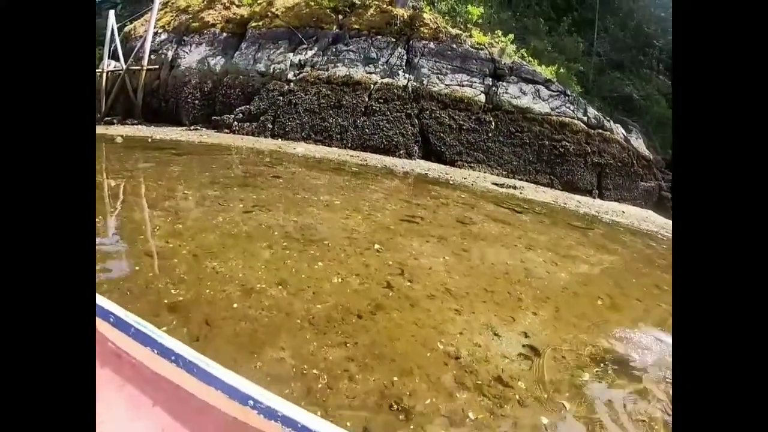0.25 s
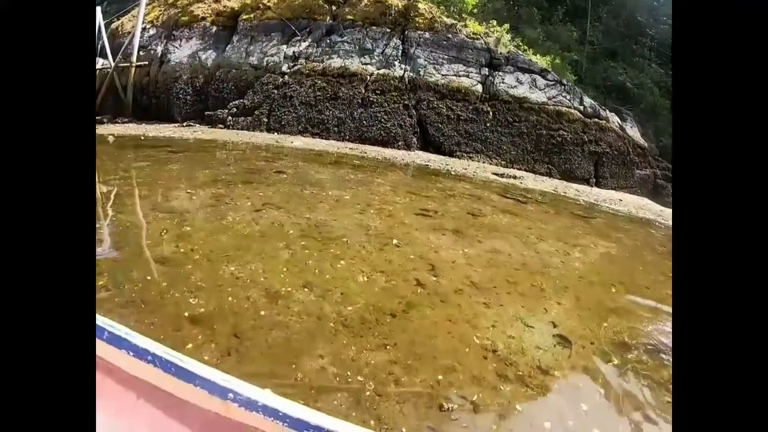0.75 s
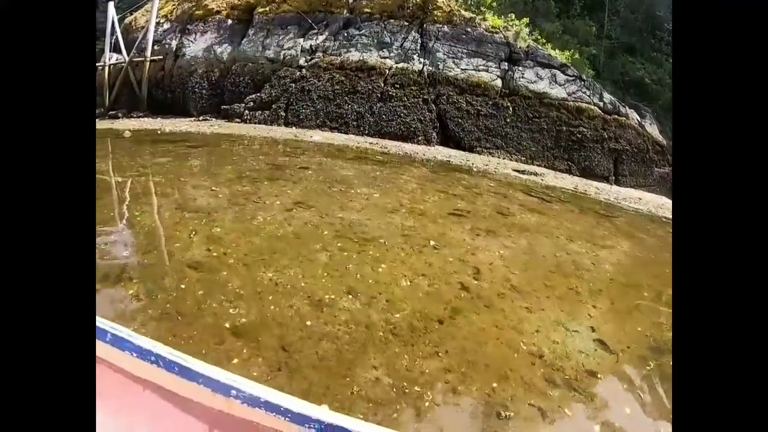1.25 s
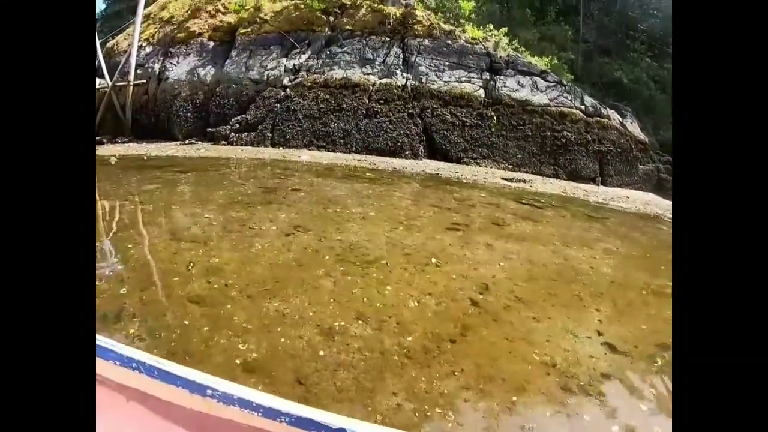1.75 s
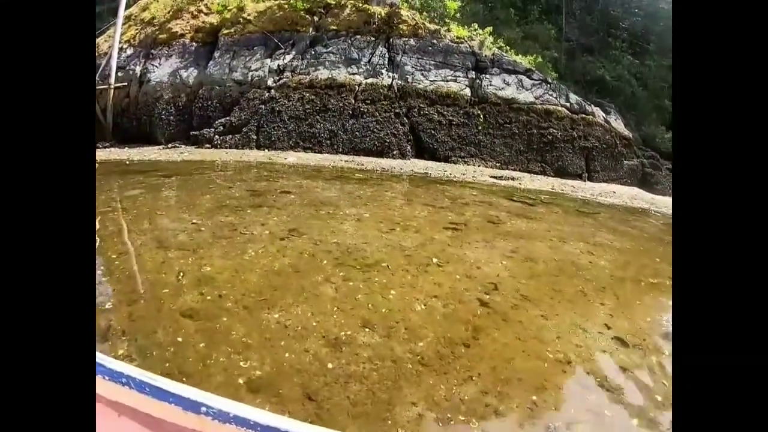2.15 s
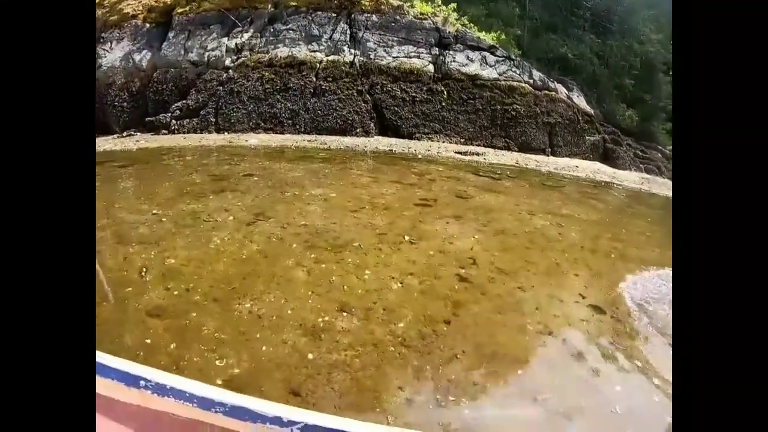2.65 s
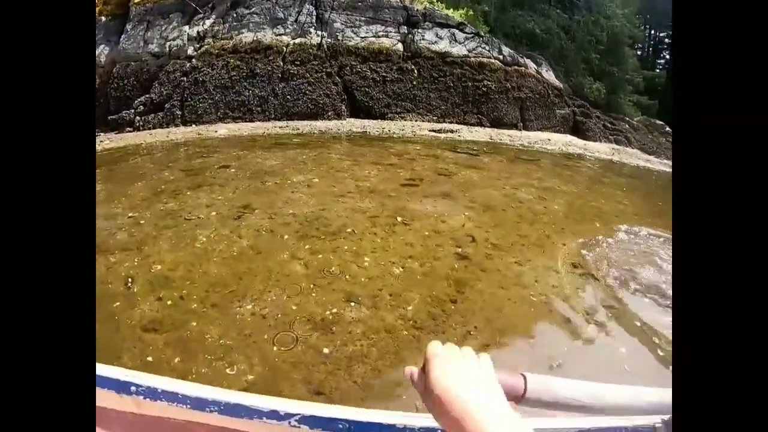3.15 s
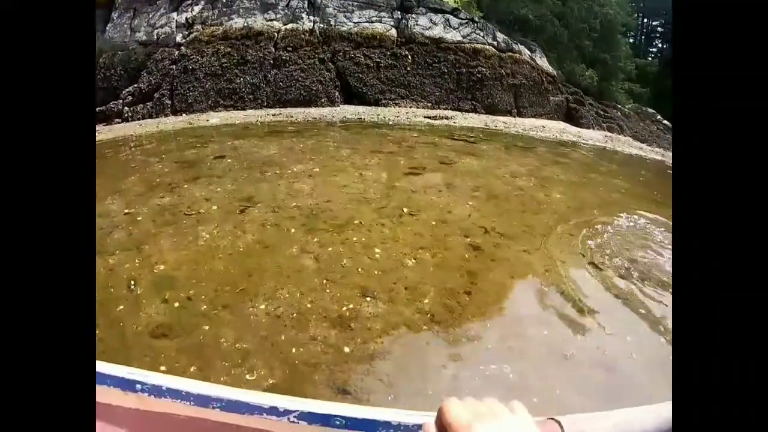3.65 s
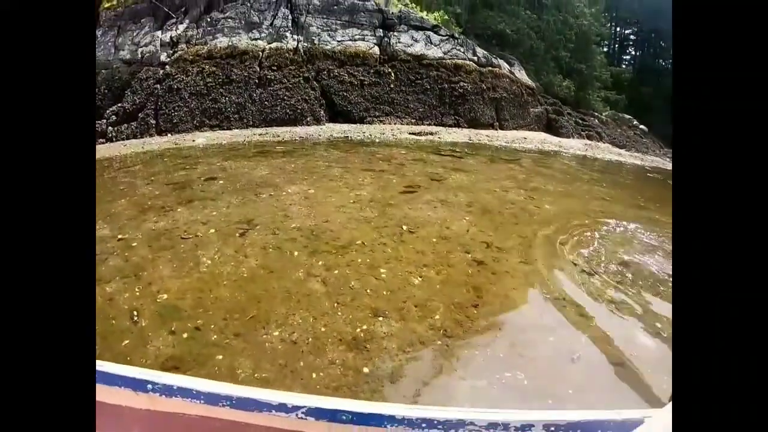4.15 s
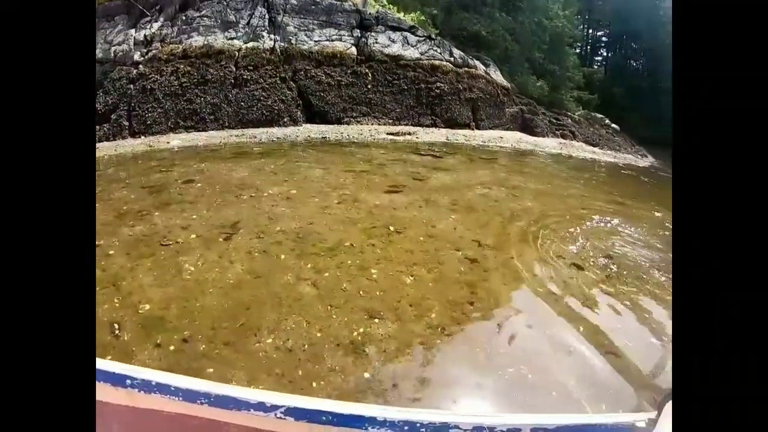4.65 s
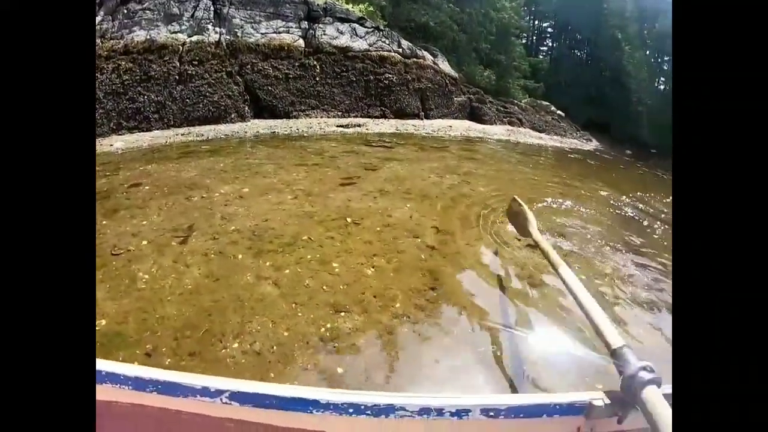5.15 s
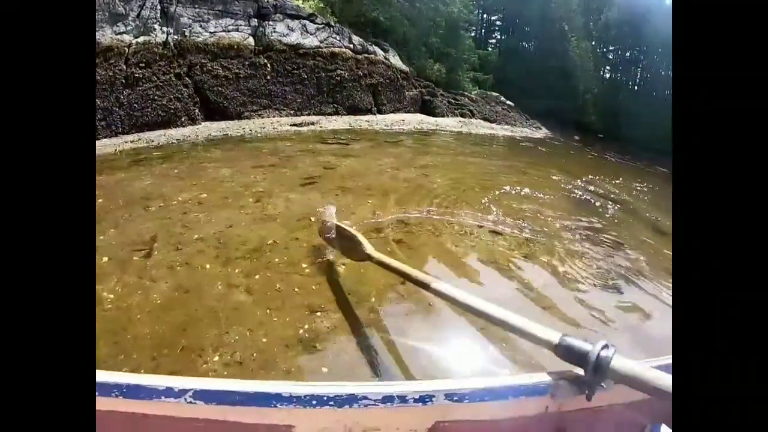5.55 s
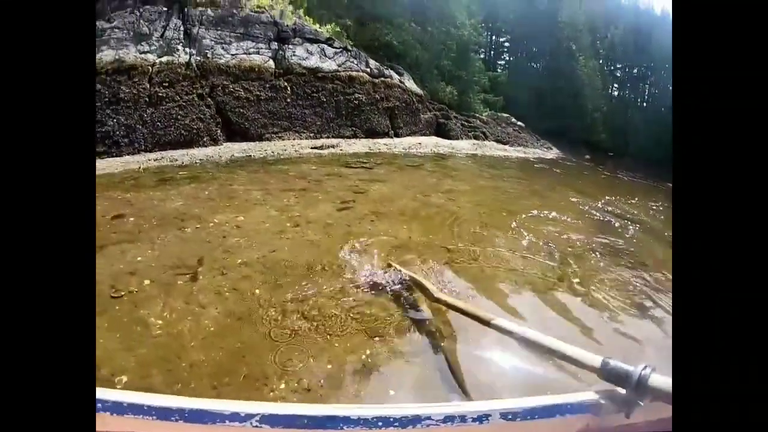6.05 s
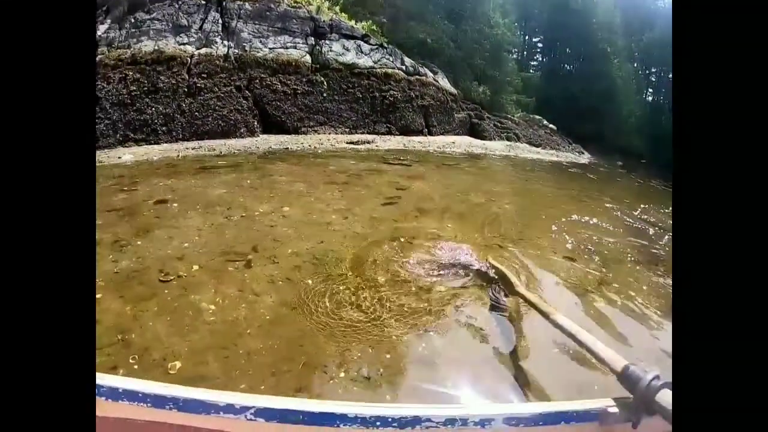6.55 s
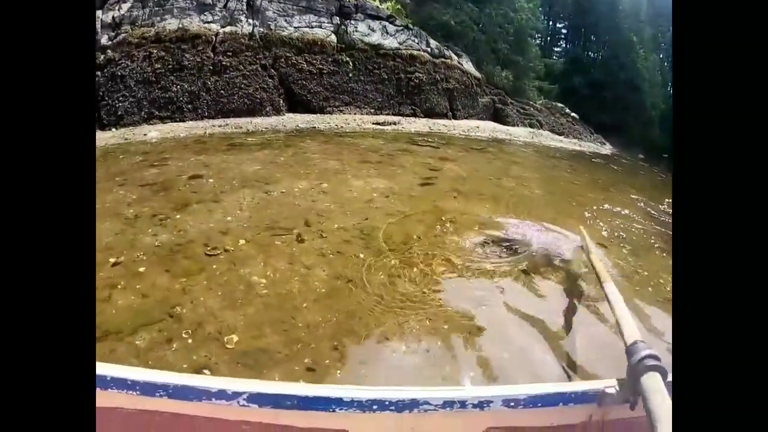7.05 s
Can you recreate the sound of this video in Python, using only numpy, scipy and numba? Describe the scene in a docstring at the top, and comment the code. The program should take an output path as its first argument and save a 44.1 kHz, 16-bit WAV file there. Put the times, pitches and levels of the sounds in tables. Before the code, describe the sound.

Hollow wooden knocks and a faint oar creak from a small rowing dinghy, with bubbly plops, gurgles and splashes in shallow, sheltered water.

```python
"""Oars knock and creak in the rowlocks of a small dinghy on shallow water, heard from a camera worn by the rower.
Knocks, a few low wind pops, slips and rubs excite damped modes; a murmur keeps the low hull modes sounding.
Blades stir crowds of pitch-climbing bubbles and noise washes; plops, gulps, droplet ticks and spray join them.
Low noise buffets, wind gusts and some hull thuds, rumble at the two microphone ports over a smooth far wash.
For a while the stereo narrows to one dull microphone, then slowly widens."""
import sys
import numpy as np
from scipy import signal
from scipy.io import wavfile
from scipy.ndimage import uniform_filter1d
from numba import njit

SR = 44100
rng = np.random.default_rng(int(sys.argv[2]) if len(sys.argv) > 2 else 0)


def inscribe(sig):
    """Save sig as 16-bit PCM at rate SR to the path in sys.argv[1].

    A 1-D sig is mono; a 2-D sig holds one channel per row.
    Samples are clipped to [-1, 1] before scaling.
    """
    pcm = np.round(np.clip(np.atleast_2d(sig).T, -1, 1) * 32767)
    wavfile.write(sys.argv[1], SR, pcm.astype(np.int16))


N = 321489

# low hull modes, before each blow shifts them: [f/Hz, level/dB, t60/s]
HULL_THUMP = [(139.8, -10.5, 0.17), (172, -2.5, 0.086), (217.5, 1.5, 0.079), (294.2, -6.5, 0.1),
              (345.7, -5.5, 0.052), (415.3, -2.5, 0.077), (506, -3.5, 0.028)]
# woody hull modes, before each blow shifts them: [f/Hz, level/dB, t60/s]
HULL_RING = [(572.6, 0.5, 0.082), (655, 5.5, 0.034), (819, 2.5, 0.033), (890, -5.5, 0.04),
             (1048, -0.5, 0.015)]


def knocks():
    """A soft push sets off the low modes, a rough scrape the higher ones; a few low wind pops share the model."""
    # oar knocks on rowlock and hull, with a few low wind pops; levels before trim:
    # [t/s, thump level/dB, woody ring over thump/dB, crack over thump/dB]
    blows = [(1.093, -13, -12, -49), (1.13, -14.5, -15.5, -26.5), (1.278, -11.5, -47, -54),
             (1.308, -8, -18.5, -29.5), (1.407, -9, -7, -13), (1.431, -22, -14, -40),
             (2.062, -17, -12.5, -6.5), (2.476, -12, -15, -49), (2.51, -21, -14.5, -48),
             (2.568, -20.5, -12.5, -47), (2.605, -34, -1.5, -46), (2.673, -22, -24, -25),
             (3.048, -27, -56, -43), (3.336, -3.5, -27.5, -78.5), (3.369, -12.5, -26.5, -39),
             (3.411, -11, -19.5, -23.5), (3.495, -9.5, -39.5, -28), (3.531, -12.5, -15, -24),
             (3.545, -10, -15.5, -58), (3.586, -17.5, -30, -21), (3.632, -19.5, -16.5, -42),
             (3.744, -27, -36, -38), (3.784, -27.5, -10, -16.5), (4.609, -19.5, -18.5, -48),
             (4.746, -23.5, -13, -43), (4.945, -13.5, -15.5, -25), (4.963, -13.5, -9.5, -20.5),
             (5.136, -22.5, -16.5, -54), (5.176, -33, -6.5, -40), (5.296, -27.5, -25, -55),
             (5.339, -19, -49, -61), (5.398, -21, -50, -34), (5.423, -21, -28, -25),
             (5.666, -23.5, -40, -30), (7.086, -22, -26, -10.5)]
    # sharpest contact modes, before each blow shifts them: [f/Hz, level/dB, t60/s]
    crack_modes = [(2130, -8.5, 0.018), (2810, 6, 0.02), (4095, 3, 0.022), (4760, -3.5, 0.035)]
    low, high = np.zeros((2, N))
    t = np.arange(SR // 8) / SR
    rough = rng.standard_normal((len(blows), 3, len(t)))
    shift = rng.standard_normal((len(blows), 20))

    def another_spot(modes, spread, u):
        """Each blow lands elsewhere, so the modes shift and change weight."""
        return [(hz * (1 + spread * u[k]), db + 2.26 * u[-1 - k], t60)
                for k, (hz, db, t60) in enumerate(modes)]

    for (s, db, ring_db, crack_db), (a, b, c), u in zip(blows, rough, shift):
        push = t / 0.00081 * np.exp(-t / 0.0011) + 0.39 * a * t / 0.0039 * np.exp(-t / 0.0094)
        scrape = b * (np.exp(-t / 0.0053) + 0.11 * np.exp(-t / 0.028)) * (1 - np.exp(-t / 0.0065))
        grit = c * (np.exp(-t / 0.00051) + 0.14 * np.exp(-t / 0.013)) * (1 - np.exp(-t / 0.00036))

        thump = band(ring(push, another_spot(HULL_THUMP, 0.031, u)), 130, 1300)
        # the modes ring above a share of the unpitched contact noise
        woody = unit(ring(scrape, another_spot(HULL_RING, .06, u))) + .9 * unit(band(scrape, 350, 1200))
        crack = unit(ring(grit, another_spot(crack_modes, .02, u))) + 1.3 * unit(band(grit, 1300, 5000))

        add(low, s - .003, peak(thump, db - 2.0))
        add(high, s - .005, peak(woody, db + ring_db + 2.5))
        add(high, s - .001, peak(crack, db + crack_db - 2.5))
    return low, high


def creak():
    """The oar turns in the rowlock by slips that ring it and carry a little grit."""
    # stick-slip impulses, before grit and ringing: [t/s, level/dB]
    slip_times = [(0.849, -50), (0.9107, -50.5), (0.9437, -48.5), (0.9577, -48.5), (0.9935, -50),
                  (1.0178, -50.5), (1.0497, -51.5), (1.073, -47), (1.1558, -51), (1.172, -56),
                  (1.214, -49.5), (1.252, -52.5)]
    # rowlock modes: [f/Hz, level/dB, t60/s]
    squeak_modes = [(1050, 4, 0.044), (1362, 11, 0.058), (2320, 2, 0.029), (2630, 3.5, 0.03)]
    s, db = np.transpose(slip_times)
    slips = np.zeros(N)
    slips[(s * SR).astype(int)] = undb(db)
    friction = signal.lfilter([1], [1, -np.exp(-1 / (0.0063 * SR))], slips)
    grit = friction * noise(1000, 5500)
    rowlock = ring(slips + 0.16 * friction * rng.standard_normal(N), squeak_modes)
    return grit + undb(-9.5) * rowlock


def rub():
    """Dense, uneven friction rings the oar collar in narrow bands as it rubs round in the rowlock."""
    # rubbing spells: [t/s, held/s, level/dB]
    rubs = [(5.635, 0.043, -54.5), (5.815, 0.03, -58)]
    # oar collar modes: [f/Hz, level/dB, t60/s]
    collar_modes = [(3060, 2, 0.015), (4110, 3, 0.013), (5950, -4, 0.013)]
    rise_db_s, fall_db_s = 2997, 195
    db = np.transpose(rubs)[2]
    gain = total(swell(rubs, db, rise_db_s, fall_db_s), np.zeros(len(rubs)))[0]
    friction = rng.standard_normal(N) * undb(2.9 * walk(150))
    return gain * unit(ring(friction, collar_modes))


def groan():
    """Oar load and lapping keep the low hull modes murmuring in uneven nudges."""
    # level of the murmur, joined by straight lines in dB: [t/s, level/dB]
    murmur = [(0.0, -38.5), (0.55, -54), (0.75, -51), (1.3, -28.5), (1.52, -44), (1.72, -68), (1.93, -41.5),
              (2.41, -56), (2.58, -44.5), (3.31, -47.5), (3.49, -34.5), (3.82, -52), (4.34, -49),
              (4.77, -43), (5.85, -41.5), (6.36, -49.5), (6.42, -38.5), (6.85, -38.5), (7.05, -52),
              (7.29, -41)]
    s, db = np.transpose(murmur)
    level_db = np.interp(np.arange(N) / SR, s, db)
    nudges = rng.standard_normal(N) * undb(2.5 * walk(45))
    body = band(ring(nudges, HULL_THUMP), 51, 336) + undb(-16.5) * ring(nudges, HULL_RING)
    return undb(level_db) * unit(body)


def strokes():
    """A blade stirs or sheds water: gains of gurgle, fizz and spray, and where the water sounds."""
    # [t/s, held/s, gurgle level/dB, fizz over gurgle/dB, spray over gurgle/dB, left minus right/dB]
    stirs = [(0, 0.23, -42, -15.5, -22.5, -24), (.55, .3, -53.5, -8.5, -13, -14),
             (1.801, 0.33, -41, -10.5, -14, -39), (2.06, 0.024, -54.5, -6, -17, -20),
             (2.304, 0.12, -51.5, -8, -12.5, -20), (2.719, 0.043, -56, -4.5, -21, 0.5),
             (3.45, 0.036, -50, -5, -16, -8.5), (4.85, 0.15, -64, 1, -7.5, -10.5),
             (6.049, 0.079, -45, -2, -17, -0.5), (6.7, 0.44, -49, -7.5, -23.5, -7)]
    rise_db_s, fall_db_s = 85, 55
    spray_rise_db_s, spray_fall_db_s = 34.5, 42
    gurgle_db, fizz_db, spray_db, pan_db = np.transpose(stirs)[2:]
    gurgle, pan_db_now = total(swell(stirs, gurgle_db, rise_db_s, fall_db_s), pan_db)
    fizz = total(swell(stirs, gurgle_db + fizz_db, rise_db_s, fall_db_s), pan_db)[0]
    spray = total(swell(stirs, gurgle_db + spray_db, spray_rise_db_s, spray_fall_db_s), pan_db)[0]
    return gurgle, fizz, spray, pan_db_now


def stirred(gurgle_gain, fizz_gain):
    """Low gurgles and high fizz, each a crowd of bubbles over its own surging wash; short drips on top."""
    surge_db = 2.5 * walk(30)
    gurgle_wash = noise(550, 1900) * undb(surge_db)
    fizz_wash = noise(1700, 4900) * undb(surge_db + 2.5 * walk(90))
    gurgle = crowd(450, 2.2, 9, .3, 3.2, count=2000) + .45 * gurgle_wash
    fizz = crowd(1600, 1.6, 8, .1, 3.0, count=3600) + .45 * fizz_wash
    drips = crowd(1800, 1.2, 2.5, .05, 3.0, count=1000)
    return gurgle_gain * unit(gurgle) + fizz_gain * (unit(fizz) + undb(-0.5) * drips)


def drops():
    """Every plop is a bubble with four quieter ones around it, a crackling splash and a burst of spray."""
    # plops and falling drops, levels before trim: [t/s, bubble level/dB, bubble f/Hz, spray over bubble/dB]
    plops = [(0.01, -34.5, 2340, 5), (0.074, -35, 3490, -25), (0.145, -37.5, 710, -3),
             (0.173, -37.5, 2870, -32), (0.364, -35.5, 1716, -8), (1.716, -43, 2520, 18),
             (1.832, -34, 1980, -26), (2.041, -34.5, 1170, 19), (2.105, -30, 1840, 4),
             (2.129, -39, 1700, 19), (2.335, -48, 855, 25), (4.668, -44, 4130, -33),
             (4.727, -40, 1960, -29), (4.853, -51, 2050, -32), (4.88, -47, 2700, -20),
             (5.04, -39, 1870, -7), (5.858, -44, 3670, -19), (5.876, -34, 3030, 2), (5.955, -45, 4170, -21),
             (6.024, -42.5, 2750, 16), (6.054, -31.5, 1290, -23), (6.073, -27.5, 1440, -23),
             (6.089, -29.5, 3830, -22), (6.113, -26, 823, -9), (6.114, -24, 3260, -21),
             (6.144, -25.5, 2970, -8), (6.29, -39, 1270, -30), (6.551, -27.5, 1223, -45),
             (6.644, -33, 763, -47), (6.676, -36, 1290, -41), (6.77, -32.5, 1920, -31),
             (6.792, -32.5, 2280, 1), (6.965, -38, 2880, -18), (6.991, -37, 1495, -41.5),
             (7.138, -38.5, 1970, -23), (7.237, -42.5, 2070, 0)]
    s, db, hz, spray_db = np.transpose(plops)
    u = rng.random((len(s), 4, 5))
    companion = np.arange(5) > 0
    start = s[:, None] + 0.027 * u[:, 0] * companion
    pitch = hz[:, None] * np.where(companion, 2 ** (2.0 * u[:, 1] - .8), 1)
    size = undb(db[:, None] + 9.5 - np.where(companion, 12 + 9 * u[:, 2], 0))
    rise = (0.03 + 0.2 * u[:, 3] ** 2) * np.minimum(900 / pitch, 1)
    cycles = 5.0 * (pitch / 1000) ** .3
    out = bubbles(N, (start.ravel() * SR).astype(np.int64), pitch.ravel(), rise.ravel(),
                  cycles.ravel(), size.ravel())

    splash, spray = np.zeros((2, N))
    t = np.arange(SR // 20) / SR
    splash_shape = (t / 0.0052) ** 2 * np.exp(-t / 0.0032)
    spray_shape = (t / 0.0035) ** 2 * np.exp(-t / 0.0015)
    crackle = rng.standard_normal((len(s), len(t)))
    for k in range(len(s)):
        colour = unit(band(crackle[k], 0.36 * hz[k], 1.26 * hz[k]))
        add(splash, s[k] - .003, colour * undb(db[k] + 5.5) * splash_shape)
        add(spray, s[k] - .005, undb(db[k] + spray_db[k] + 1.5) * spray_shape)
    return out + splash * undb(2.5 * walk(400)), spray


def gulps():
    """Large bubbles gulp upwards, their pitch climbing fast."""
    # [t/s, level/dB, starting f/Hz, climb/octaves per ring-down]
    big_bubbles = [(0.244, -44, 1820, 0.18), (.343, -26.5, 481, 1), (0.401, -28.5, 950, 0.73),
                   (0.429, -29, 760, 0.43), (0.441, -34.5, 350, 0.52), (2.513, -28.5, 1136, 0.27),
                   (2.629, -26.5, 764, 0.27), (6.164, -21, 1150, 0.6), (6.195, -23, 1345, 0.33),
                   (6.745, -31, 1260, 0.32), (7.049, -27.5, 1210, 0.23), (7.118, -33, 730, 0.41)]
    s, db, hz, climb = np.transpose(big_bubbles)
    cycles = np.full(len(s), 7.0)
    return bubbles(N, (s * SR).astype(np.int64), hz, climb, cycles, undb(db))


def ticks():
    """Each droplet ticks on the surface as a short bright crackle with its own colour."""
    # levels before trim: [t/s, level/dB]
    droplets = [(0.1264, -40), (0.225, -39), (2.3115, -30), (2.5356, -37), (2.6569, -48), (2.733, -40.5),
                (2.8325, -47), (5.0015, -45), (5.0484, -33.5), (5.2395, -44), (5.254, -38), (5.509, -40)]
    rise_s, fall_s = 0.0015, 0.0014
    out = np.zeros(N)
    t = np.arange(SR // 40) / SR
    shape = (1 - np.exp(-t / rise_s)) * np.exp(-t / fall_s)
    crackle = rng.standard_normal((len(droplets), len(t)))
    for (s, db), c in zip(droplets, crackle):
        lo_hz = 2500 * 2 ** np.clip(c[0] / 2, -1, 1)
        add(out, s - .001, peak(band(c * shape, lo_hz, 3.5 * lo_hz), db - 4.0))
    return out


def mist(steady, bursts):
    """Spray hisses in flickers and bursts; shared and unrelated noise reach the two ports."""
    gain = steady * undb(0.7 * walk(30) + 2.5 * walk(110)) + bursts

    def hiss():
        """A bright band with a weaker, wavering one above it."""
        return noise(4700, 8830) + noise(10000, 13000, order=3) * undb(-11.5 + 2.4 * walk(26))

    shared, left, right = hiss(), hiss(), hiss()
    return gain * (right + 1.1 * shared), gain * 1.15 * (left - 0.55 * shared)


def buffets():
    """Low buffets rumble at each port, wind gusts and some low hull thuds, all as bands of uneven noise."""
    # [t/s, held/s, level/dB, deep part over it/dB, left minus right/dB]
    low_buffets = [(.14, 0.049, -45.5, -22, 0), (1.29, 0.077, -30.5, -32, -2), (1.75, 0.24, -33, -3, -4.5),
                   (2.1, 0.36, -41, 3.5, -9.5), (2.5, 0.087, -27, -6, -13.5), (2.919, 0.016, -40, 2.5, 1.5),
                   (3.39, 0.19, -42.5, -23.5, -11), (4.06, 0.098, -45.5, 5.5, -5),
                   (4.379, 0.0085, -39, 5, -1), (4.97, 0.19, -42.5, -2.5, -14), (6.55, 0.28, -51, -29, 2)]
    rise_db_s, fall_db_s, calm_db = 187.5, 112, -75.5
    db, deep_db, pan_db = np.transpose(low_buffets)[2:]
    deep_gain = total(swell(low_buffets, db + deep_db, rise_db_s, fall_db_s), pan_db)[0]
    gain, pan_db_now = total(swell(low_buffets, db, rise_db_s, fall_db_s), pan_db)

    def port():
        """One port's own rumble, its upper edge and the deep part."""
        rumble = noise(51.4, 121.5, order=3) * undb(2.0 * walk(21))
        edge = noise(81, 290, order=3) * undb(-13.0 + 4.2 * walk(30))
        deep = noise(22, 52.4, order=3) * undb(2.0 * walk(4.52))
        return (gain + undb(calm_db)) * (rumble + edge) + deep_gain * deep

    return pan(port(), pan_db_now, port())


def cove():
    """Smooth far lapping: a distant wash of noise bands, nearly steady."""
    # [low edge f/Hz, high edge f/Hz, level/dB]
    wash_bands = [(380, 1630, -62.5), (500, 3540, -66.5)]
    return sum(undb(db + 1.1 * walk(9.9)) * noise(lo_hz, hi_hz, order=3) for lo_hz, hi_hz, db in wash_bands)


def scatter(x):
    """Short diffuse scatter off the planks and the rower, different at each port."""
    echo_db, t60_s = -3.5, 0.033
    t = np.arange(SR // 10) / SR
    tails = rng.standard_normal((2, len(t))) * undb(-60 * t / t60_s)
    tails = tails / np.sqrt((tails ** 2).sum(1, keepdims=True))
    return undb(echo_db) * np.array([signal.fftconvolve(x, tail)[:N] for tail in tails])


@njit
def bubbles(n, start, hz, rise, cycles, size):
    """Each bubble rings down in so many cycles while its pitch climbs as it nears the surface."""
    out = np.zeros(n)
    for k in range(len(start)):
        span, turns = cycles[k] * SR / hz[k], 0.  # samples per ring-down; phase in cycles
        for i in range(min(int(5 * span), n - start[k])):
            turns += min(hz[k] * 2 ** (rise[k] * i / span), .45 * SR) / SR
            envelope = np.exp(-turns / cycles[k]) * (1 - np.exp(-3 * i / span))
            out[start[k] + i] += size[k] * envelope * np.sin(2 * np.pi * turns)
    return out


def crowd(lo_hz, octaves, cycles, rise, spread_db, count=1000):
    """Bubbles at random moments and pitches, few of them loud."""
    # bubble level against pitch: [f/Hz, level/dB]
    bubble_colour = [(400, -14), (800, 0), (1400, -1), (2200, -2), (3500, -1), (5000, -5)]
    moment, height, loudness, length, climb = rng.random((count, 5)).T
    hz = lo_hz * 2 ** (octaves * height)
    colour_hz, colour_db = np.transpose(bubble_colour)
    level_db = np.interp(np.log(hz), np.log(colour_hz), colour_db)
    size = undb(level_db - spread_db * np.log(0.0073 + loudness))
    start = (moment * N).astype(np.int64)
    return unit(bubbles(N, start, hz, rise * climb ** 2.34, cycles * (0.28 + length), size))


def ring(x, modes):
    """Damped resonators, alternately in and out of phase."""
    out = 0
    for k, (hz, db, t60) in enumerate(modes):
        pole = np.exp(2j * np.pi * hz / SR - np.log(1000) / (t60 * SR))
        out = out + (-1) ** k * undb(db) * signal.lfilter([1], [1, -pole], x).imag
    return out


def swell(events, db, rise_db_s, fall_db_s):
    """Gain of each event, every 64 samples: it rises, holds and falls at steady rates in dB."""
    t = np.arange(0, N, 64) / SR
    s, held = np.transpose(events)[:2, :, None]
    before, after = np.maximum(s - t, 0), np.maximum(t - s - held, 0)
    return undb(db[:, None] - rise_db_s * before - fall_db_s * after)


def total(gains, pan_db):
    """Summed gain of overlapping events, and the side of the stronger ones."""
    power = gains ** 2
    summed = power.sum(0)
    side_db = pan_db @ power / (summed + 1e-30)
    steps = np.arange(0, N, 64)
    return [np.interp(np.arange(N), steps, v) for v in (np.sqrt(summed), side_db)]


def pan(x, db, other=None):
    """Left and right with a level step between them; the mean of one panned signal keeps its level."""
    left = 2 / (1 + undb(-db))
    return np.array([left * (x if other is None else other), (2 - left) * x])


def walk(rate):
    """Random levels held 1 / rate s and slewed twice; spread near 2."""
    k = int(SR / rate)
    held = np.repeat(rng.standard_normal(N // k + 1), k)
    return 2.66 * uniform_filter1d(uniform_filter1d(held, k), k)[:N]


def noise(lo_hz, hi_hz, order=2):
    """Band of noise at unit RMS."""
    return unit(band(rng.standard_normal(N), lo_hz, hi_hz, order=order))


def band(x, lo_hz, hi_hz, order=2):
    """Band-pass filter."""
    sos = signal.butter(order, [lo_hz, min(hi_hz, .45 * SR)], "band", fs=SR, output="sos")
    return signal.sosfilt(sos, x)


def undb(db):
    """Decibels to amplitude."""
    return 10 ** (np.asarray(db) / 20)


def unit(x):
    """Scales to unit RMS."""
    return x / np.sqrt(np.mean(x ** 2))


def peak(x, db):
    """Scales to a peak level."""
    return x * undb(db) / np.abs(x).max()


def add(out, s, x):
    """Mixes a short sound in at a time."""
    i = int(s * SR)
    out[i:i + len(x)] += x[:N - i]


def scene():
    """Places hull, water, spray and low buffets at the left and right ports."""
    low, high = knocks()
    low = low + groan()
    # the low part booms from below; the rowlock itself sounds from the right
    boom = np.array([0.8 * low, 0.83 * np.roll(low, shift=5)])
    rowlock = (high + creak() + rub()) * np.array([[.4], [1.6]])
    hull = boom + scatter(high + 0.19 * low) + rowlock

    gurgle, fizz, spray, pan_db = strokes()
    plops, bursts = drops()
    water = plops + ticks() + gulps() + stirred(gurgle, fizz) + cove()
    # the left port is in the shadow of the camera; a late path round its body arrives in opposite phase
    late = 0.22 * np.roll(water, 9) * np.array([[1], [-1]])
    water = pan(water, pan_db) + scatter(water) + late

    right, left = mist(spray, bursts)
    return hull + water + pan(right, 0.033 * pan_db, left) + buffets()


def record(dry):
    """The camera blends the ports towards one dull microphone, adds a faint hiss and cuts the top."""
    narrows_s, narrowing_s = 2.77, 0.15  # start and time constant of the stereo dying away
    widens_s, widening_s = 4.4, 1.39  # start and length of its creeping back
    hiss_db, top_hz = -100, 15600
    t = np.arange(N) / SR
    closing = np.exp(-np.maximum(t - narrows_s, 0) / narrowing_s)
    opening = np.clip((t - widens_s) / widening_s, 0, 1) ** 2
    width = np.maximum(closing, opening)

    mid, side = (dry[0] + dry[1]) / 2, (dry[0] - dry[1]) / 2 * width
    dull = signal.sosfiltfilt(signal.butter(6, 5000, fs=SR, output="sos"), mid)
    treble = (mid - dull) * np.maximum(np.sqrt(width), undb(-14.5))
    mid = dull + treble + undb(hiss_db) * rng.standard_normal(N)
    soft = signal.sosfilt(signal.butter(3, 12500, fs=SR, output="sos"), [mid + side, mid - side])
    return signal.sosfilt(signal.ellip(8, .2, 70, top_hz, fs=SR, output="sos"), soft)


dry = scene()
out = record(dry)
inscribe(out)
```